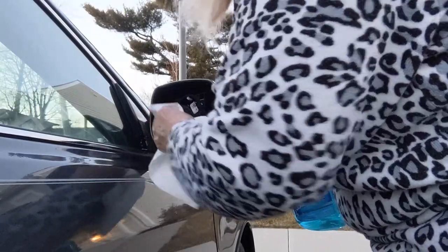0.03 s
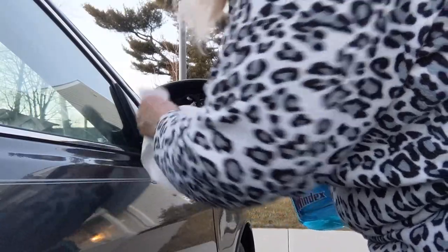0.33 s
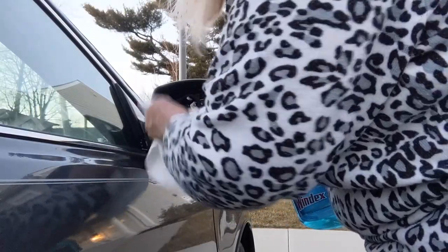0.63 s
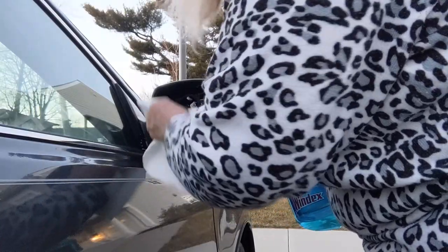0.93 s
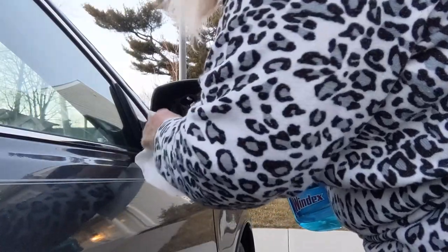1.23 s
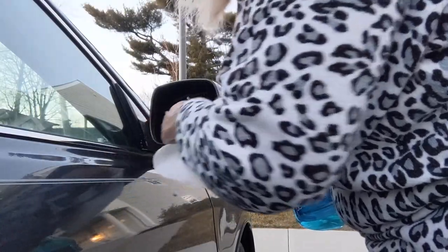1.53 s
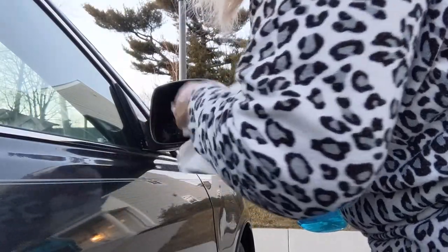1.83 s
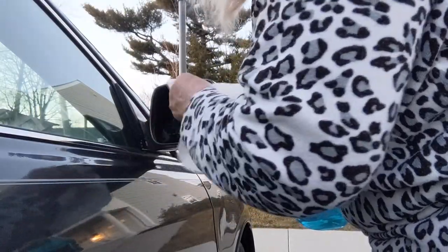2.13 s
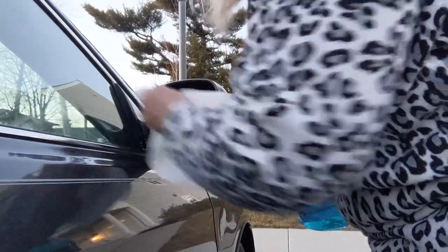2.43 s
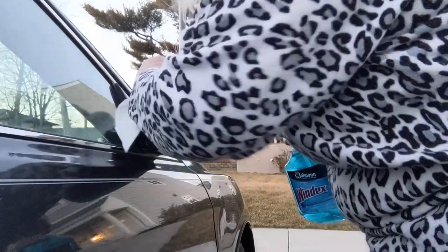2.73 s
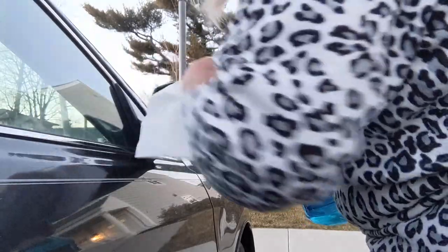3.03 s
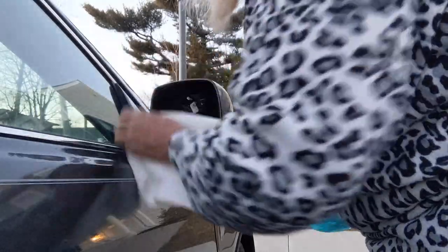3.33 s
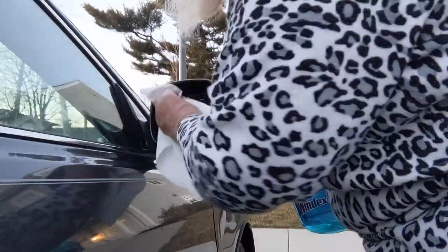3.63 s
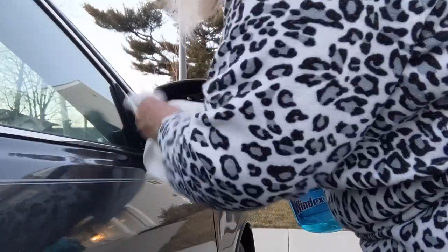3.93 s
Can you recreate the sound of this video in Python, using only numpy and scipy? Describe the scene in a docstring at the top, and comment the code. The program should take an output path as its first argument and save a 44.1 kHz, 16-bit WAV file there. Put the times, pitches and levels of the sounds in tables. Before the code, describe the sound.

A paper towel rubs a car's side mirror in soft, uneven, hissing strokes throughout. Light hollow bumps and plastic ticks come between 0.4 and 0.9 seconds, with sharp little clicks near 1.5 and 2 seconds. The wiping eases around 2 to 2.6 seconds, then resumes, firmest near 3.7. Low wind rumbles on the microphone over distant traffic, buffeting more from 2.2 to 3.3 seconds.

```python
"""Outdoors at a parked car, a paper towel is rubbed over the side mirror.
Its fibres catch and let go, so each stroke rasps, hisses and crinkles. Pushes and bumps shake the
hollow housing, the plastic ticks, and the glass knocks twice in its mount.
Light wind buffets the microphone over a bed of far traffic."""
import sys
import numpy as np
from scipy import signal
from scipy.fft import rfft, irfft
from scipy.io import wavfile

SR = 44100
rng = np.random.default_rng(int(sys.argv[2]) if len(sys.argv) > 2 else 0)


def dump_mix(stems):
    """Bounce the given channels to the path in sys.argv[1] as a 16-bit WAV at rate SR."""
    frames = np.atleast_2d(stems).T  # one column per channel
    limited = np.clip(frames, -1, 1)  # hard clip at full scale
    pcm = np.round(limited * 32767).astype(np.int16)
    wavfile.write(sys.argv[1], SR, pcm)


N = 176400
TIME = np.arange(N) / SR
BIN_HZ = np.maximum(np.arange(N // 2 + 1) * SR / N, 1)

# Colours are relative levels per Hz. Pan is left minus right. Likeness is 1 for mono, 0 for wide.
# colour of the traffic bed: f/Hz, level/dB
TRAFFIC_COLOUR = [(100, 4), (200, 6), (310, -2.5), (450, -.5), (750, 2.5), (1000, -0.5), (1400, -8.5),
                  (2000, -16), (3000, -22), (5000, -27), (7500, -59.5), (11000, -36), (16000, -37)]
# its stereo image: f/Hz, likeness
TRAFFIC_LIKENESS = [(150, 1), (500, 0.74), (1000, 0.47), (2000, 0), (8000, 0)]
# its fader ride: t/s, level/dB, extra treble/dB
TRAFFIC_RIDE = [(0, 0.5, 0), (2.2, 1, 2), (2.45, -3, -1), (2.62, -1, -1), (2.8, -.5, 2), (4, 2, -2)]
# its steady hums: f/Hz, level/dB
TRAFFIC_HUMS = [(56.3, -53), (373, -71.5)]
# colour of wind on the microphone ports: f/Hz, level/dB
WIND_COLOUR = [(15, -8.5), (25, 7.5), (40, 3.5), (55, 8), (75, -1), (100, -2), (150, -9.5), (220, -21),
               (320, -26.5), (600, -50.5)]
# its stereo image: f/Hz, likeness
WIND_LIKENESS = [(25, 0.69), (60, 0.87), (200, 0.35)]
# single eddies: middle t/s, half length/s, level/dB, centre f/Hz, pan/dB
BUFFETS = [(0.164, 0.019, -43.5, 56, 0), (0.518, 0.013, -39.5, 60.6, 2), (1.132, 0.057, -39.5, 53.7, 10),
           (1.318, 0.0099, -36, 45.7, 5), (2.261, 0.016, -33, 72, -11), (2.304, 0.03, -34, 59.4, 25),
           (2.441, 0.019, -29.5, 81.5, 29), (2.559, 0.025, -33.5, 64, -31), (2.685, 0.027, -36, 79, -16),
           (2.743, 0.013, -36, 69, 25), (3.141, 0.0071, -28, 62, -12), (3.211, 0.013, -29.5, 83.3, -27),
           (3.304, 0.03, -37, 56.3, -30), (3.855, .06, -39.5, 60.7, 16)]
# towel strokes: t/s, length/s, attack/s, release/s, rasp/dB, hiss/dB, low rim/dB, high rim/dB, pan/dB
STROKES = [(.0, .23, 0.099, .02, -65.5, -71, -75, -78, 2.5),
           (0.234, 0.29, 0.015, 0.19, -68.5, -72.5, -78, -86, 3),
           (0.475, .16, 0.038, 0.02, -58.5, -66, -66, -71, 1.5),
           (0.621, 0.097, .015, 0.018, -70, -70.5, -76, -80, 0),
           (0.71, 0.075, 0.02, .03, -71, -67, -76, -73, 3),
           (0.766, 0.16, 0.12, 0.026, -55.5, -62, -63.5, -68.5, 1.5),
           (0.933, 0.12, .025, 0.085, -65, -67.5, -80, -84, 2),
           (1.069, 0.11, 0.045, 0.053, -58.5, -61, -63, -65, 0.5),
           (1.17, .1, .02, .03, -74, -73, -75, -84, -2),
           (1.256, 0.14, 0.048, 0.04, -63, -68.5, -67, -73, -1),
           (1.367, 0.28, 0.071, 0.065, -59.5, -63.5, -65, -74, 0.5),
           (1.572, 0.31, 0.065, 0.06, -63, -68, -75, -73, 0.5),
           (1.77, 0.19, 0.11, 0.049, -65, -62, -73, -67.5, 1.5),
           (2.104, 0.11, .04, 0.064, -75, -66, -78, -72, 1),
           (2.236, .11, 0.045, 0.066, -62.5, -63, -72, -66.5, 2),
           (2.499, 0.15, 0.09, .05, -76, -72, -79, -79, 1),
           (2.677, 0.1, 0.01, 0.057, -64.5, -68, -87, -73, 5),
           (2.74, 0.29, 0.12, 0.046, -67, -67, -75, -70, 2.5),
           (2.931, 0.45, 0.087, 0.24, -62.5, -63, -68.5, -66.5, 3.5),
           (3.355, 0.073, 0.029, 0.049, -59.5, -61.5, -82, -86, 4.5),
           (3.42, .16, 0.015, .1, -66.5, -71, -72.5, -90, 7),
           (3.552, 0.16, .1, .04, -59.5, -63, -74, -69, 3.5),
           (3.681, 0.21, 0.073, .13, -53, -57, -60.5, -61.5, 3),
           (3.825, 0.2, 0.047, 0.2, -57.5, -63, -64, -81, 1.5)]
# colour of the towel's rasp: f/Hz, level/dB
RASP_COLOUR = [(350, 0), (600, -4), (1000, -2), (1500, 3), (2200, -4), (2700, 0.5), (3300, -1),
               (4100, -4.5), (5400, -6), (6300, -10), (7300, -9.5), (10000, -11.5)]
# colour of its fine hiss: f/Hz, level/dB
HISS_COLOUR = [(4000, 0.5), (6000, 2), (7300, 1), (8700, 9.5), (9700, 9), (10800, 11), (13500, 8.5),
               (16000, -2.5)]
# stereo image of the rub: f/Hz, likeness
RUB_LIKENESS = [(400, 1), (1500, 0.81), (3300, 0.18), (5500, 0.13), (9000, -0.051), (15000, -0.07)]
# low and high tone of the gap between glass and rim: f/Hz, width/Hz
RIM_TONES = [(3350, 790), (5500, 2800)]
# ticks of plastic and creased paper: t/s, level/dB, centre f/Hz, half width/octaves, decay/s, pan/dB
TICKS = [(.137, -57, 3460, 0.42, .003, -1), (0.4453, -50, 4200, .8, 0.0055, 12),
         (.4482, -45, 3400, 2.6, 0.0013, -5), (0.5517, -45, 3060, 0.26, 0.0077, -2),
         (0.552, -46, 4600, 2, 0.0066, -3), (1.5277, -28.5, 4360, 0.32, 0.0009, 1.5),
         (1.9955, -55, 12000, 0.92, 0.009, -2), (2.0214, -34, 12900, 1.2, 0.0013, -2.5),
         (2.0262, -42.5, 9000, 2.1, 0.0014, 0), (3.428, -56, 7000, 1.6, .003, -3),
         (3.478, -65, 4000, 0.88, .004, 3), (3.644, -45.5, 2700, 1.04, 0.0084, 0)]
# firm pushes on the mirror: middle t/s, half length/s, level/dB, housing pitch f/Hz
PUSHES = [(0.458, 0.011, -48, 470), (0.511, 0.014, -50, 573), (0.557, 0.016, -48.5, 530),
          (0.617, 0.028, -56.5, 680), (0.824, 0.012, -53, 580), (0.865, 0.015, -47.5, 550),
          (1.105, 0.016, -49.5, 590), (1.469, 0.012, -53, 517), (1.555, 0.055, -55, 440),
          (1.765, 0.064, -55.5, 438), (2.035, 0.081, -60.5, 510), (3.772, 0.049, -52, 556)]
# modes of the hollow housing: multiple of the pitch, width/Hz, level/dB
HOUSING_MODES = [(1, 320, 2), (1.5, 110, -13), (2.0, 190, -7)]
# the hand bumps the housing: t/s, level/dB, f/Hz, t60/s
BUMPS = [(.4475, -37, 442, 0.041), (.553, -45.5, 507, 0.15), (.808, -41.5, 624, 0.047),
         (.849, -38.5, 566, 0.036)]
# the glass knocks in its mount: t/s, level/dB
KNOCKS = [(0.4492, -57.5), (2.0226, -44.5)]
# modes of glass and mount: f/Hz, relative level/dB, t60/s
MOUNT_MODES = [(1570, -1, 0.027), (1645, 0, 0.022), (2900, -4, 0.015), (5360, -2, .012), (5600, -4, 0.006),
               (9100, -20, .018), (10300, -7, 0.027)]

HOUSING_PAN_DB = 4.5


def from_db(db):
    """Decibels to gain."""
    return 10 ** (np.asarray(db) / 20)


def unit_rms(x):
    """Scale to unit power."""
    return x / np.sqrt(np.mean(x ** 2) + 1e-20)


def curve(points):
    """Draw a curve over the FFT bins, straight on a log-frequency axis."""
    hz, values = np.transpose(points)
    return np.interp(np.log(BIN_HZ), np.log(hz), values)


def pan(db):
    """Constant-power left and right gains."""
    gains = from_db(np.array([[.5], [-.5]]) * db)
    return gains / np.sqrt(np.mean(gains ** 2, axis=0))


def drift(rate_hz):
    """A smooth random modulator of unit spread."""
    hop, run_in = 40, 2000
    r = np.exp(-2 * np.pi * hop * rate_hz / SR)
    noise = rng.standard_normal(N // hop + run_in + 2)
    slow = signal.lfilter([1], [1, -2 * r, r * r], noise)[run_in:]
    return np.interp(np.arange(N) / hop, np.arange(len(slow)), unit_rms(slow))


def coloured(pair, colour, likeness):
    """EQ two unrelated signals and mix them to stereo as mid and side."""
    mid, side = rfft(pair) * from_db(curve(colour))
    alike = np.clip(curve(likeness), -1, 1)
    stereo = np.sqrt(1 + alike) * mid + np.sqrt(1 - alike) * side * [[1], [-1]]
    return unit_rms(irfft(stereo, N))


def band(x, hz, octaves):
    """Band-pass reaching so many octaves to either side."""
    edges = np.clip([hz / 2 ** octaves, hz * 2 ** octaves], 10, .45 * SR)
    return signal.sosfilt(signal.butter(2, edges, "band", fs=SR, output="sos"), x + 1e-18)


def resonate(x, hz, width_hz):
    """One resonance with unit gain at its peak."""
    r = np.exp(-np.pi * width_hz / SR)
    feedback = [1, -2 * r * np.cos(2 * np.pi * hz / SR), r * r]
    return signal.lfilter(np.array([1, 0, -1]) * (1 - r * r) / 2, feedback, x + 1e-18)


def noise_tone(noise, hz, width_hz):
    """Two passes through a resonance turn noise into a breathy tone of unit power."""
    return unit_rms(resonate(resonate(noise, hz, width_hz), hz, width_hz))


def grains(per_s, spread_db):
    """Two random trains of tiny slips of uneven size."""
    sizes = from_db(spread_db * np.minimum(rng.exponential(1, (2, N)), 6))
    signs = rng.choice([-1, 1], (2, N))
    fires = rng.random((2, N)) < per_s / SR
    return unit_rms(sizes * signs * fires)


def swell(x, s, half_s):
    """Fade a sound in and out on a bell curve, matching its power to the curve's."""
    bell = np.exp(-.5 * np.minimum(((TIME - s) / half_s) ** 2, 100))
    return unit_rms(x * bell) * np.sqrt(np.mean(bell ** 2))


def traffic(bed_db=-52.5, treble_hz=3000):
    """Far roads blend into a wash with faint hums; the wash dips and dulls briefly."""
    times, *rides = np.transpose(TRAFFIC_RIDE)
    ride_db, treble_db = (np.interp(TIME, times, ride) for ride in rides)
    wash = coloured(rng.standard_normal((2, N)), TRAFFIC_COLOUR, TRAFFIC_LIKENESS)
    body = signal.sosfiltfilt(signal.butter(2, treble_hz, fs=SR, output="sos"), wash)
    wash = body + (wash - body) * from_db(treble_db)
    fader = from_db(bed_db + ride_db + .5 * drift(rate_hz=4.4))
    hum = sum(from_db(db) * noise_tone(rng.standard_normal(N), hz, width_hz=6.9)
              for hz, db in TRAFFIC_HUMS)
    return wash * fader * pan(db=3) + hum


def wind(rumble_db=-42.5):
    """Air rumbles on the microphone ports; many of its eddies hit mainly one side."""
    rumble = coloured(rng.standard_normal((2, N)), WIND_COLOUR, WIND_LIKENESS)
    out = rumble * from_db(rumble_db + .5 * drift(rate_hz=8.4))
    for s, half_s, db, hz, pan_db in BUFFETS:
        eddy = band(rng.standard_normal(N), hz, octaves=.42)
        out = out + from_db(db) * swell(eddy, s, half_s) * pan(pan_db)
    return out


def friction(colour):
    """Countless fibres catch and let go: equal parts grain and smooth noise."""
    slips = grains(per_s=5000, spread_db=2.7) + rng.standard_normal((2, N))
    return coloured(slips, colour, RUB_LIKENESS)


def stroke_gains():
    """Stereo envelopes for rasp, hiss and rim tones as the hand speeds up, slides and stops."""
    power = 0
    for s, length_s, attack_s, release_s, *levels_db, pan_db in STROKES:
        attack = np.clip((TIME - s) / attack_s, 0, 1)
        release = np.clip((s + length_s - TIME) / release_s, 0, 1)
        slide = (attack * release) ** 1.5 * pan(pan_db) ** 2
        power = power + from_db(levels_db)[:, None, None] ** 2 * slide
    return np.sqrt(power)


def towel(crinkle_vs_hiss_db=-13, air_hz=11800, flutter_db=1.1):
    """Paper rasps and hisses on glass, the rim gap colours the rub, and creases snap."""
    rasp_gain, hiss_gain, *rim_gains = stroke_gains()
    rasp = friction(RASP_COLOUR) * rasp_gain
    for (hz, width_hz), gain in zip(RIM_TONES, rim_gains):
        rasp = rasp + gain * noise_tone(friction(RASP_COLOUR), hz, width_hz)
    snaps = grains(per_s=110, spread_db=4)[0]
    crinkle = from_db(crinkle_vs_hiss_db) * unit_rms(band(snaps, hz=7500, octaves=2.8))
    hiss = (friction(HISS_COLOUR) + crinkle) * hiss_gain * pan(db=.5)
    air = 1 / (1 + (air_hz / BIN_HZ) ** 10)
    hiss = irfft(rfft(hiss) * pan(db=-23 * air), N)  # the top end leans right
    return (rasp + hiss) * from_db(flutter_db * drift(rate_hz=35))


def ticks():
    """Plastic and creased paper give dry cracks that die within milliseconds."""
    out = 0
    for s, db, hz, octaves, decay_s, pan_db in TICKS:
        envelope = (TIME >= s) * np.exp(-np.clip((TIME - s) / decay_s, 0, 30))
        mid, side = rng.standard_normal((2, N))
        wide_noise = mid + 1.5 * side * [[1], [-1]]
        crack = unit_rms(band(wide_noise * envelope, hz, octaves)) * np.sqrt(np.mean(envelope ** 2))
        out = out + from_db(db) * crack * pan(pan_db)
    return out


def housing_pushes():
    """Under a firm push the towel sticks and slips, shaking the hollow shell."""
    slips = grains(per_s=900, spread_db=3)[0]
    out = 0
    for s, half_s, db, hz in PUSHES:
        shell = sum(from_db(mode_db) * resonate(slips, hz * ratio, width_hz)
                    for ratio, width_hz, mode_db in HOUSING_MODES)
        out = out + from_db(db) * swell(band(shell, hz, octaves=.82), s, half_s)
    return out * pan(HOUSING_PAN_DB)


def housing_bumps():
    """A soft blow of the hand leaves the hollow shell ringing briefly."""
    out = 0
    for s, db, hz, t60 in BUMPS:
        age = np.clip(TIME - s, 0, 1)
        out = out + from_db(db - 60 * age / t60) * np.sin(2 * np.pi * hz * age)
    return out * pan(HOUSING_PAN_DB)


def glass_knocks():
    """Each knock rings the bright, short modes of the glass and its mount."""
    blows, out = np.zeros(N), 0
    for s, db in KNOCKS:
        blows[int(s * SR)] = from_db(db)
    for hz, db, t60 in MOUNT_MODES:
        r = from_db(-60 / (t60 * SR))
        angle = 2 * np.pi * hz / SR
        ring = signal.lfilter([0, np.sin(angle)], [1, -2 * r * np.cos(angle), r * r], blows + 1e-18)
        out = out + from_db(db) * ring
    return out


def scene():
    """The wiping up close, over a bed of wind and traffic."""
    mirror = towel() + housing_pushes() + housing_bumps() + ticks() + glass_knocks()
    return mirror + wind() + traffic()


def record(dry):
    """A steep high cut at 15.9 kHz on the whole mix."""
    return signal.sosfilt(signal.ellip(12, .1, 80, 15900, fs=SR, output="sos"), dry)


dry = scene()
out = record(dry)
dump_mix(out)
```